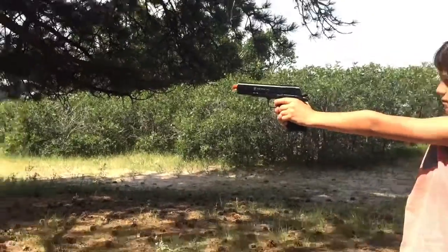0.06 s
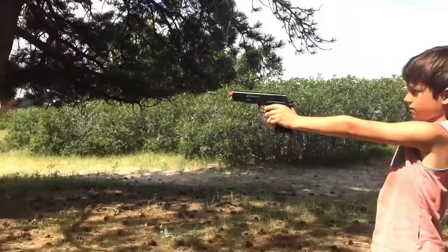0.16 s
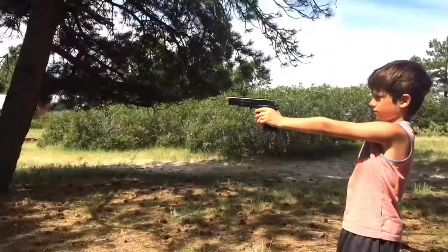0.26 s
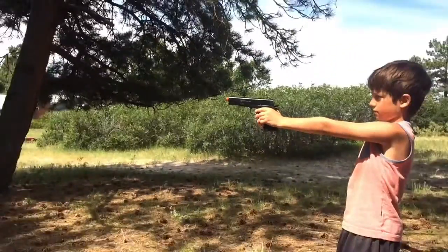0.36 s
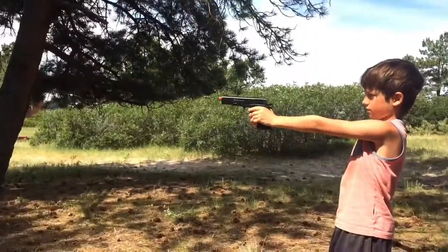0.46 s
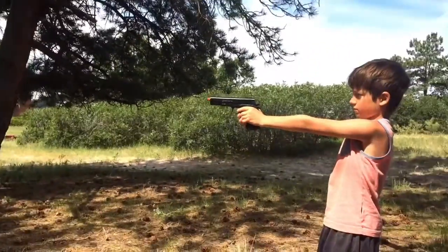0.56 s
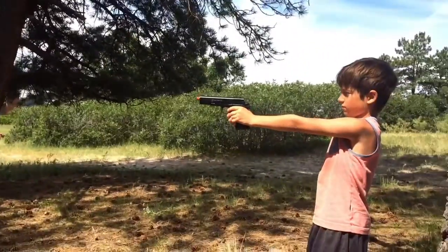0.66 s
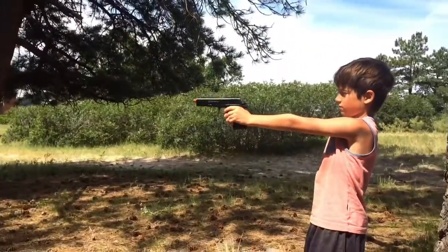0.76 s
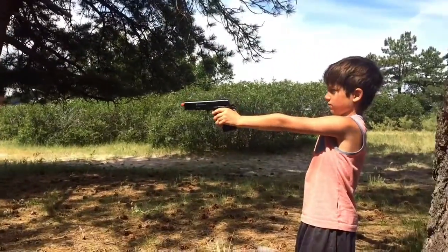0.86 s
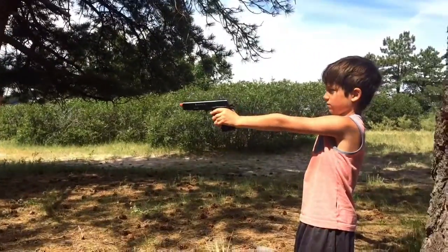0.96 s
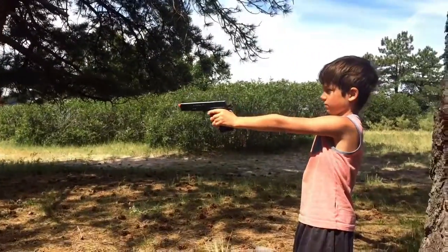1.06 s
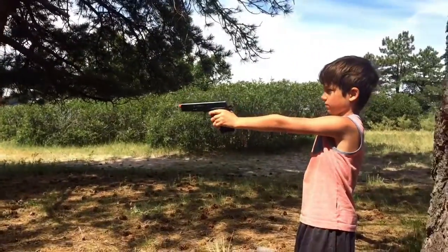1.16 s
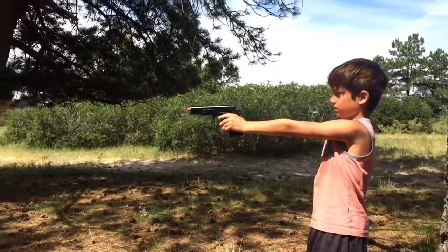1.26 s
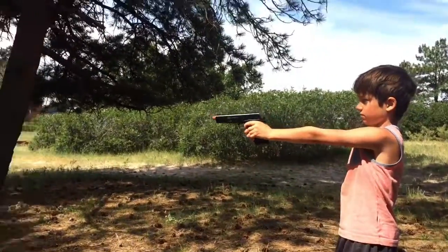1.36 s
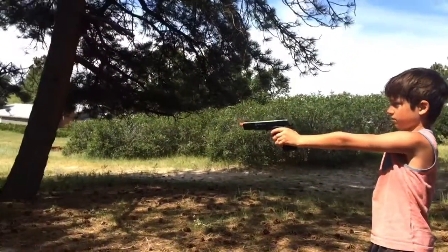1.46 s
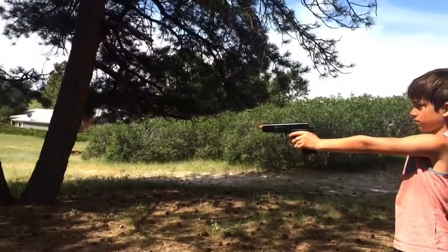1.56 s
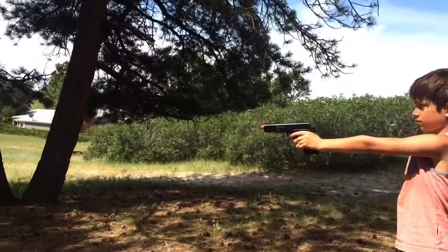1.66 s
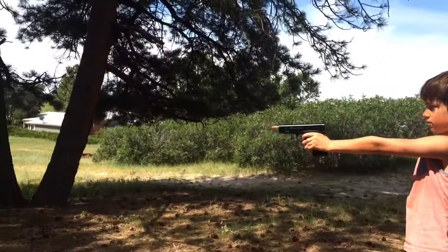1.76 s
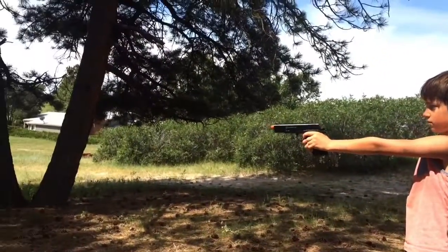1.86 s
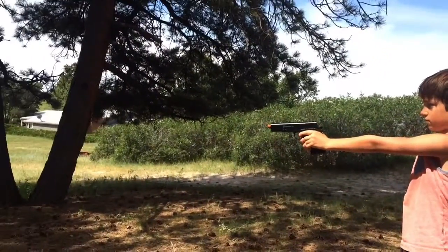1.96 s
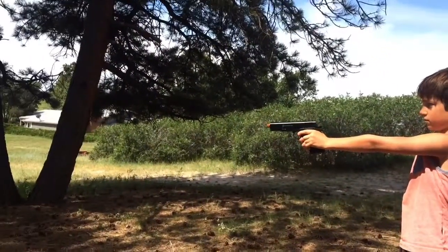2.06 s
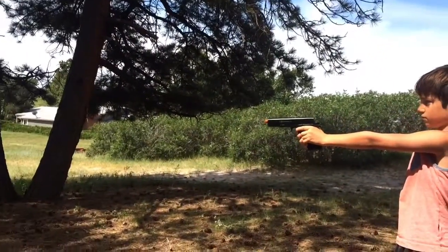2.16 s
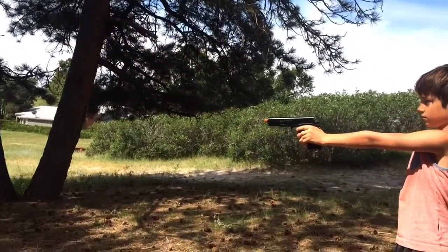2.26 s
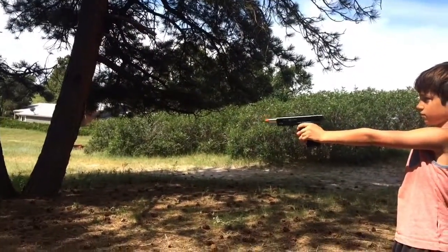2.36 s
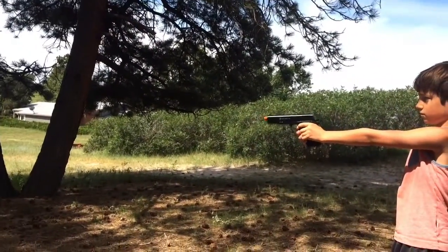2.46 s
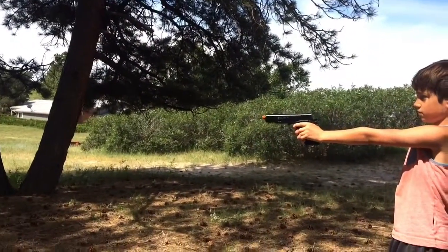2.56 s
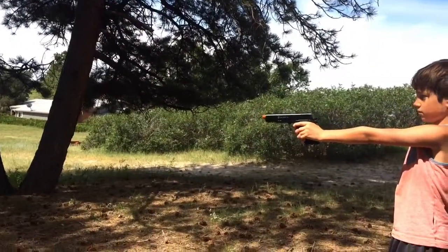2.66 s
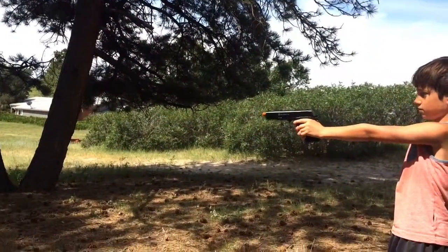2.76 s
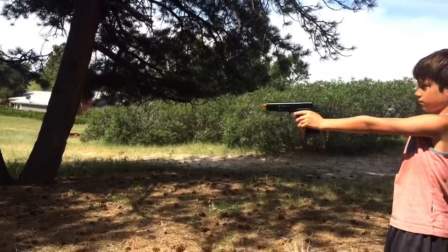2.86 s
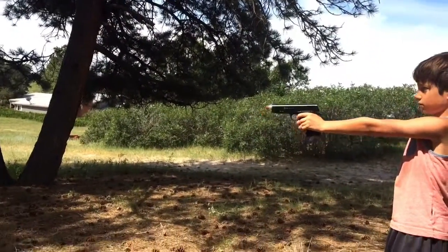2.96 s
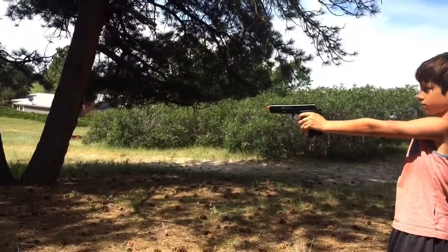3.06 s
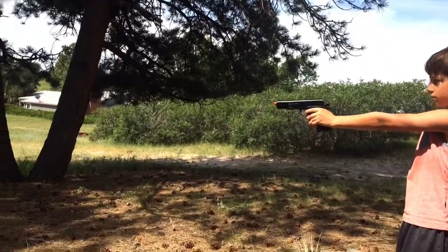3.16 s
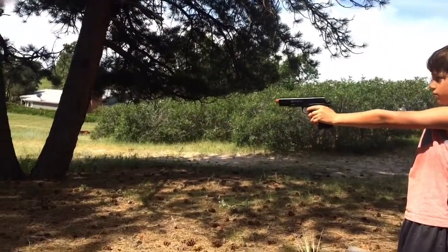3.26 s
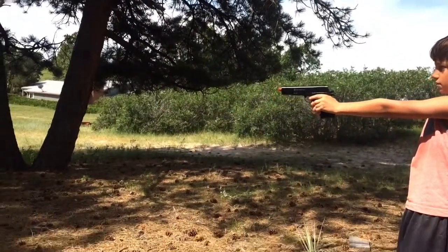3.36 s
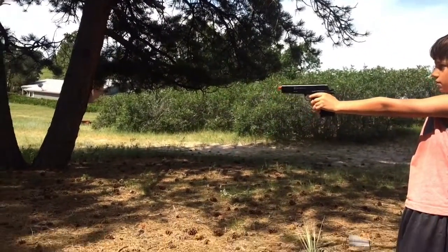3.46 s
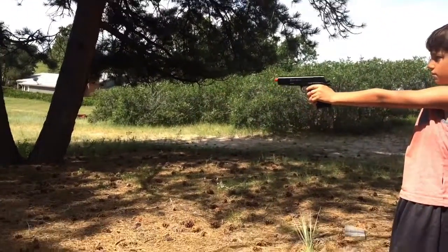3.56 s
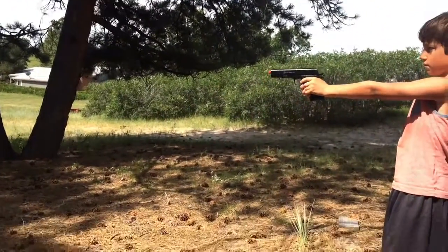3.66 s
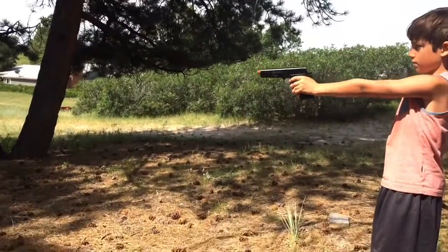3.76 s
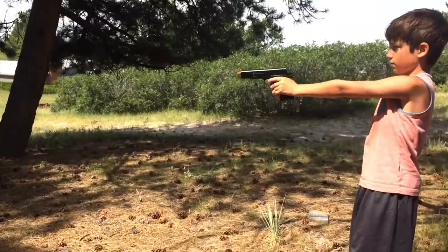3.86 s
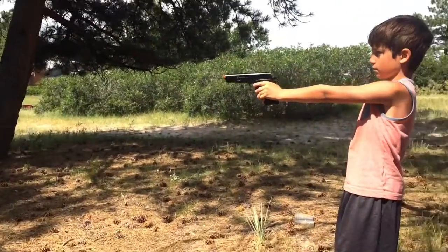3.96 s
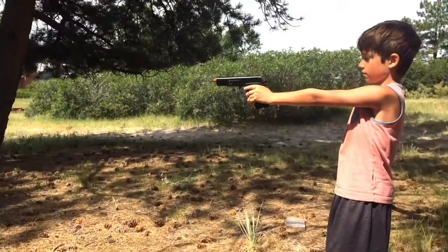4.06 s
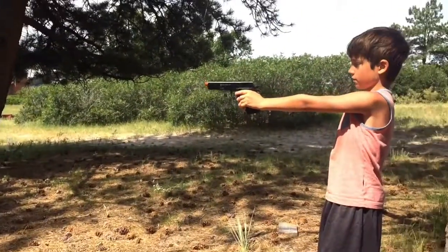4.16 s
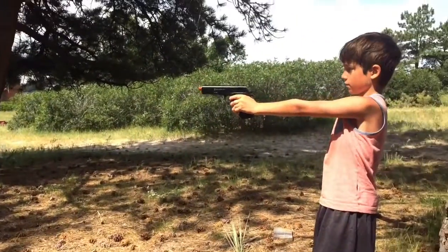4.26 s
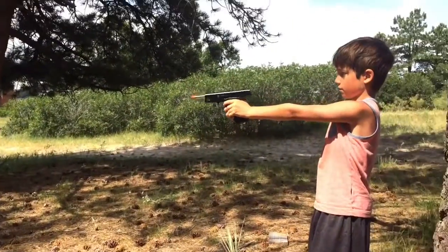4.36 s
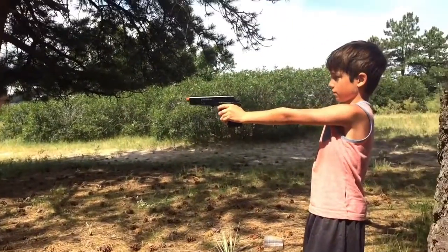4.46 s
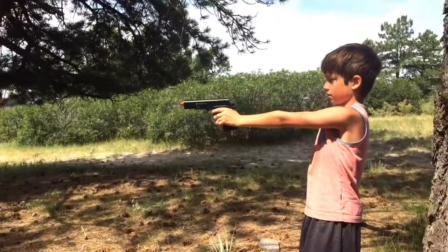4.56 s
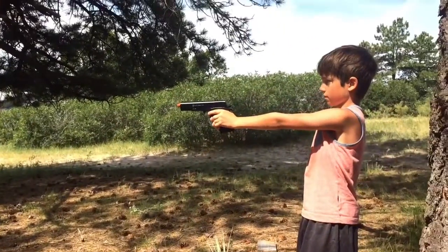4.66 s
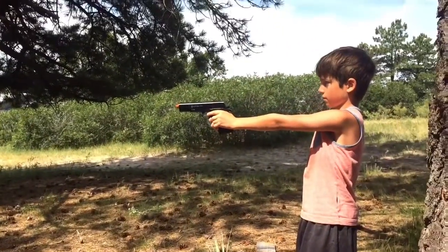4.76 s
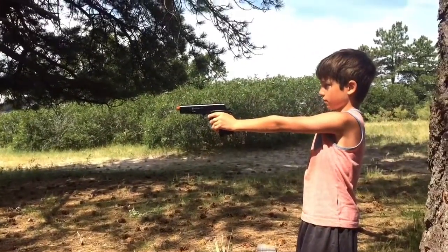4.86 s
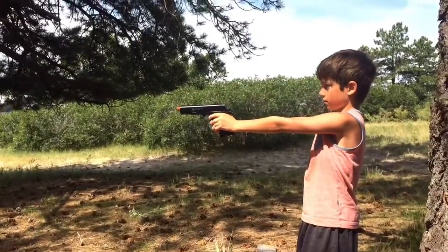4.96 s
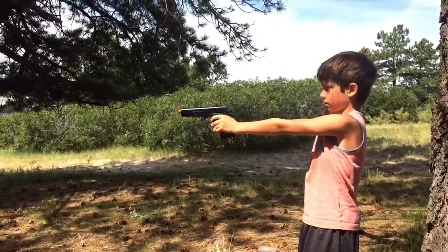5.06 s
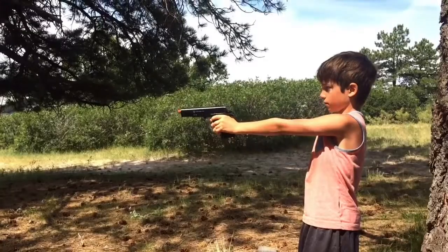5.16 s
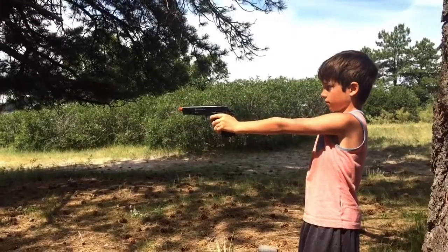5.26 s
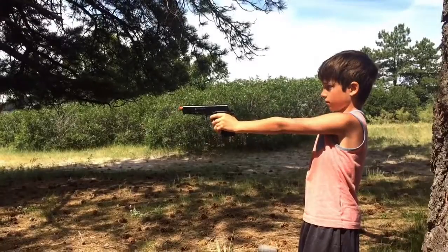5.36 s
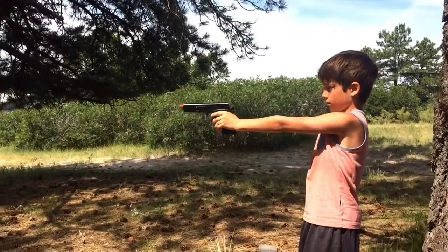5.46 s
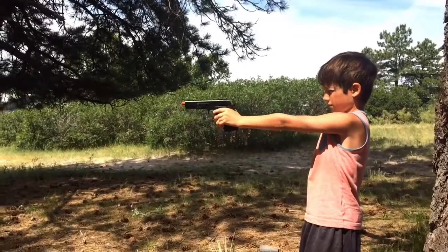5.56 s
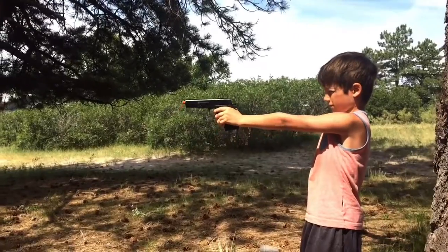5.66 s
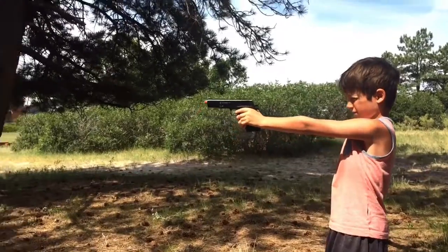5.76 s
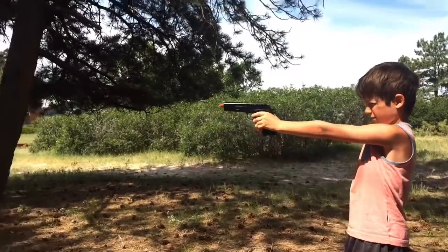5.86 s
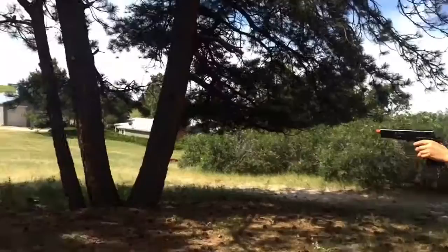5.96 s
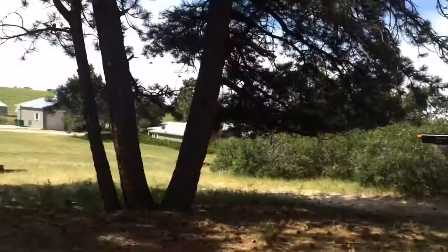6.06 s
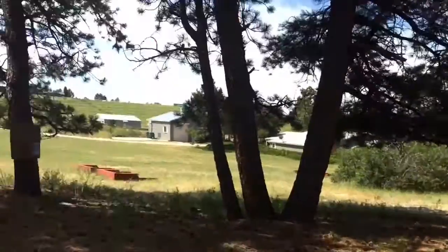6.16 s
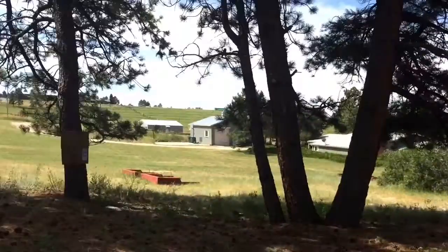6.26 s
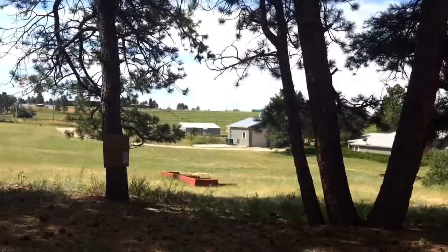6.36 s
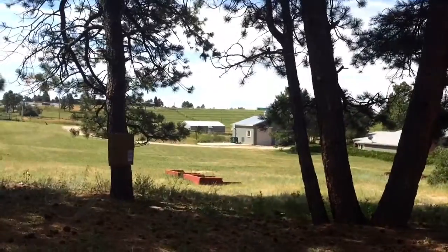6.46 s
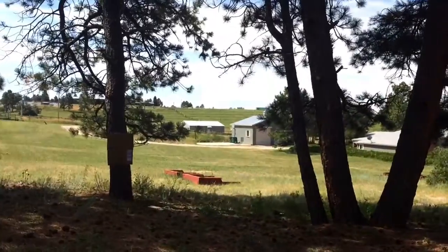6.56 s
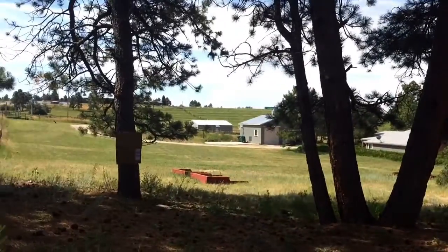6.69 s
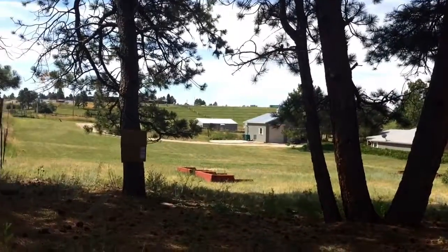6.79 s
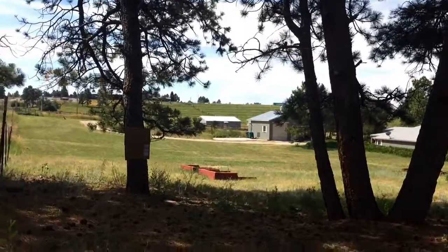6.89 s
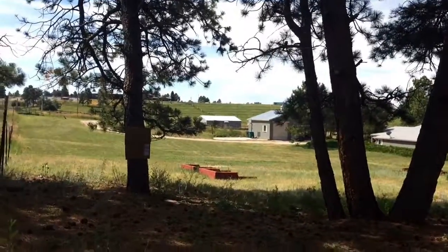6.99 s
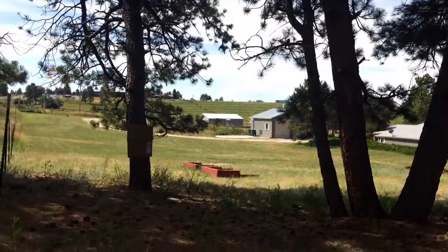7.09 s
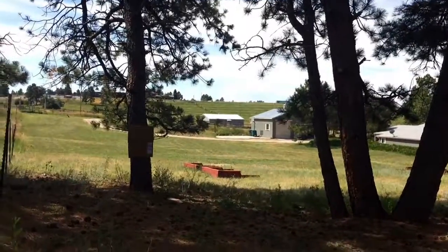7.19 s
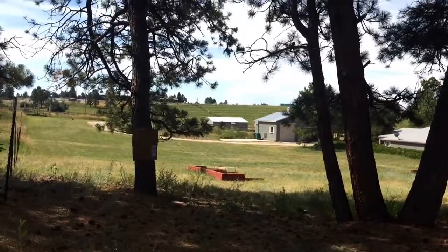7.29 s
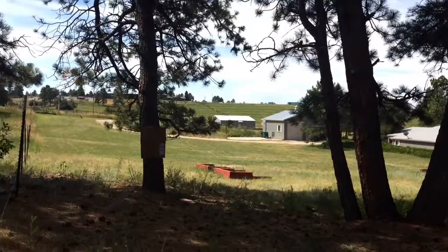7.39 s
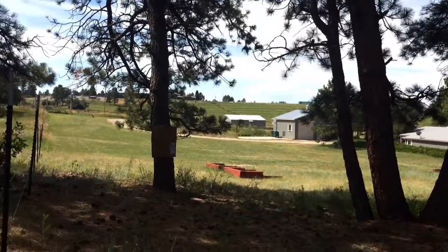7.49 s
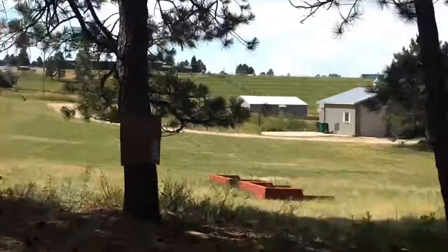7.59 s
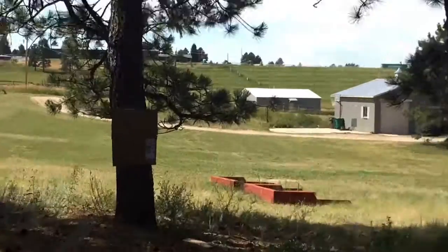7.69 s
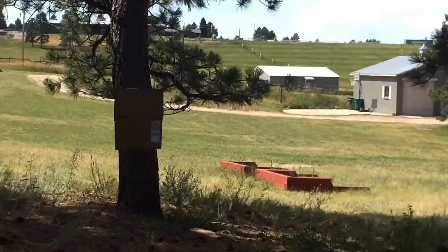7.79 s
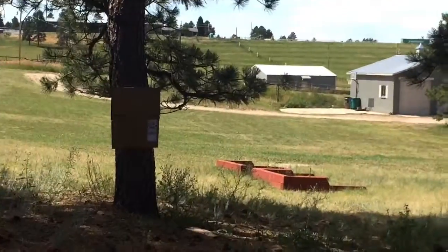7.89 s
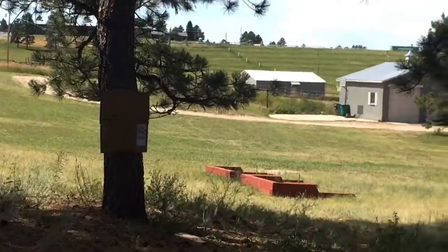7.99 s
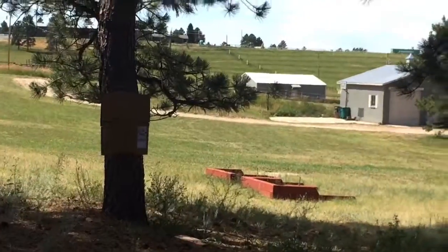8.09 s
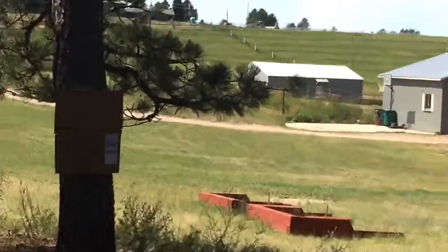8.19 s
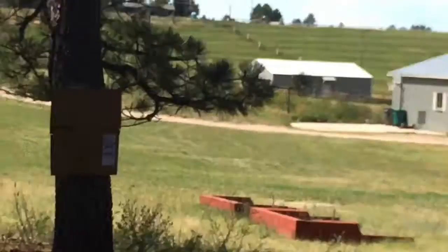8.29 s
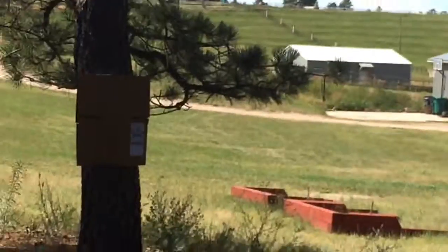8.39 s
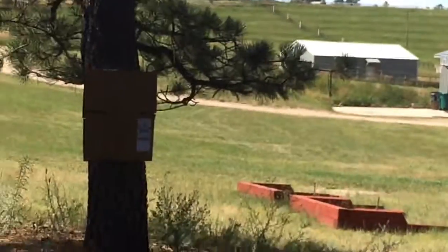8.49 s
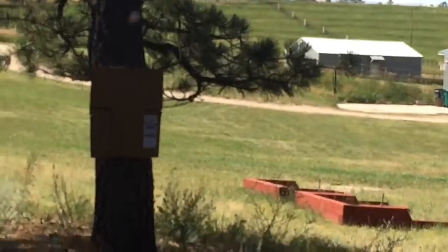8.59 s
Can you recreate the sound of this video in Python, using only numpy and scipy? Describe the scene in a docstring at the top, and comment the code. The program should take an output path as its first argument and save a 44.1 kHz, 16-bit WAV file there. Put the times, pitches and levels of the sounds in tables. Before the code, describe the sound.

Eight snappy airsoft pistol shots in a steady run, then one more after a pause, with pellets hitting cardboard and faint birdsong.

```python
"""Small birds call under pine trees over a faint rumble, and something knocks softly. Then a gas blowback
airsoft pistol fires nine times: each shot is a puff of gas that drives the slide back, and a spring slams
it shut. Trunks scatter the crack, and a tenth of a second after most shots the pellet smacks a cardboard
target on a trunk. The trigger clicks as it resets, then far buildings and woods return a dull echo.
The birds are heard again in the pause before the last shot."""
import sys
import numpy as np
from scipy import signal
from scipy.fft import rfft, irfft
from scipy.io import wavfile
from scipy.ndimage import uniform_filter1d

SR = 44100
rng = np.random.default_rng(int(sys.argv[2]) if len(sys.argv) > 2 else 0)


def put_to_file(sound):
    """Save the sound as 16-bit audio at rate SR, in the file named by the first command-line argument."""
    columns = np.atleast_2d(sound).T  # one column per channel
    safe = np.clip(columns, -1, 1)
    whole_steps = np.round(safe * 32767)
    wavfile.write(sys.argv[1], SR, whole_steps.astype(np.int16))


N = 380583
TIME = np.arange(N) / SR
AGE = TIME[:SR // 5]  # time within a puff or a bird note
BLOW = TIME[:SR // 16]  # time since a contact
CENTRE_S = AGE.mean()  # pre-roll of a puff or a recoil stroke


def from_db(db):
    """Decibels to gain."""
    return 10 ** (np.asarray(db) / 20)


def rms_one(x):
    """Scale to unit power."""
    return x / np.sqrt(np.mean(x ** 2) + 1e-20)


def fade(t60, age=AGE):
    """Exponential decay, 60 dB down after t60 seconds."""
    return np.exp(-np.log(1000) * age / t60)


def add(track, s, sound):
    """Mix a sound in at time s."""
    start = max(round(s * SR), 0)
    track[start:start + len(sound)] += sound[:N - start]


def through(x, response):
    """Pass a sound through an impulse response."""
    return signal.oaconvolve(x, response)[:len(x)]


def butter(order, hz, kind):
    """Butterworth filter sections."""
    return signal.butter(order, hz, kind, fs=SR, output="sos")


def colour(x, eq):
    """Minimum-phase EQ of unit power: the curve sets the tone, not the level."""
    size = 2048
    hz, db = np.transpose(eq)
    bin_hz = np.arange(size // 2 + 1) * SR / size
    gain = from_db(np.interp(np.log(bin_hz + 1), np.log(hz), db))
    cepstrum = irfft(np.log(rms_one(gain)))
    cepstrum[1:size // 2] *= 2
    cepstrum[size // 2 + 1:] = 0
    return through(x, irfft(np.exp(rfft(cepstrum))))


def burst(t60):
    """The dense, quickly dying vibration of one contact."""
    return rng.standard_normal(len(BLOW)) * fade(t60, BLOW)


def tone(hz, t60):
    """One struck mode."""
    return fade(t60, BLOW) * np.sin(2 * np.pi * hz * BLOW)


def ring(modes, hz_scale):
    """Struck modes, each a little different in strength from blow to blow."""
    return sum(from_db(db + rng.standard_normal()) * tone(hz * hz_scale, t60) for hz, db, t60 in modes)


# Bass-heavy outdoor bed: (frequency [Hz], level [dB])
AIR_EQ = [(15, -39.5), (25, -10.5), (70, 2.5), (206, -10), (270, -19.5), (394, -19.5), (1260, -28),
          (1890, -27.5), (2550, -31.5), (3720, -30.5), (4370, -35.5), (5280, -30.5), (8590, -36.5),
          (14800, -38.5), (16000, -48)]


def open_air():
    """A faint hiss over a steady rumble."""
    air = colour(rng.standard_normal(N), AIR_EQ)
    rumble = signal.sosfilt(butter(2, [35, 200], "band"), air)
    hiss = signal.sosfilt(butter(3, 280, "high"), air)
    return from_db(-66) * rms_one(rumble) + from_db(-71.5) * rms_one(hiss)


def phrase(start_s, count, period_s, length_s, from_hz, to_hz, db, bend=1, rasp=0):
    """A bird repeats one gliding note; bend over 1 holds its first pitch, rasp tears it downwards."""
    out, along = np.zeros(N), np.linspace(0, 1, round(length_s * SR))
    envelope = from_db(db) * signal.windows.tukey(len(along), .3)
    for k in range(count):
        wobble = rms_one(uniform_filter1d(rng.standard_normal(len(AGE)), size=50))
        flutter = np.abs(wobble[:len(along)])
        hz = from_hz * (to_hz / from_hz) ** (along ** bend) * (1 - rasp * along * flutter)
        add(out, start_s + k * period_s, envelope * np.sin(2 * np.pi * np.cumsum(hz) / SR))
    return out


def birds():
    """A peep, falling whistles, thin twitters, faint chirps and raspy chips, smeared by the foliage."""
    peep = phrase(.1, 1, period_s=0, length_s=.055, from_hz=4000, to_hz=4200, db=-60.5, rasp=.2)
    whistles = phrase(.246, 3, period_s=.2305, length_s=.157, from_hz=7450, to_hz=3400, db=-57, rasp=.012)
    twitters = phrase(.56, 3, period_s=.075, length_s=.06, from_hz=7600, to_hz=8600, db=-70, bend=2)
    chirps = phrase(6.505, 2, period_s=.338, length_s=.045, from_hz=4000, to_hz=2700, db=-72)
    chips = phrase(7.082, 4, period_s=.133, length_s=.06, from_hz=4520, to_hz=4200, db=-61,
                   bend=3, rasp=.26)
    song = peep + whistles + twitters + chirps + chips
    foliage = rms_one(rng.standard_normal(len(AGE)) * fade(t60=.33)) / np.sqrt(len(AGE))
    return .49 * (song + through(song, foliage))


# Knock cues: (time [s], relative level [dB])
KNOCK_CUES = [(0.61, -48.5), (2.286, -37.5), (2.386, -40), (2.409, -37), (2.819, -33.5), (5.134, -34),
              (5.181, -40), (5.269, -39.5), (8.304, -44.5)]
# Boxy midrange of a knock: (frequency [Hz], level [dB])
KNOCK_EQ = [(150, -20), (500, -12), (850, 2.5), (1150, -3), (1600, -14.5), (3500, -26.5), (12000, -39.5)]


def knocks():
    """Soft hollow knocks, each one damped contact."""
    out = np.zeros(N)
    for s, db in KNOCK_CUES:
        add(out, s + .0053, from_db(db - 7) * colour(burst(t60=.049), KNOCK_EQ))
    return out


VENT_S = .0056  # from the valve opening to the gas venting


def gas_puff():
    """A slow dip of pressure, the spike from the muzzle, and a suction when the valve shuts."""
    t = AGE - CENTRE_S
    spike_s, spread_s, dip_lead_s, dip_s = .0004, .0041, .0075, .0076
    spike = lambda u: (np.exp(-np.abs(u) / spike_s) + np.exp(-np.abs(u) / spread_s)) / 2
    dip = from_db(-6.5) * np.exp(-np.abs(t + dip_lead_s) / dip_s)
    suction = from_db(3) * spike(t - VENT_S)
    # the air moves out and back: no net push
    return signal.sosfiltfilt(butter(2, 39, "high"), spike(t) - suction - dip)


def recoil_stroke():
    """The hammer falls, gas escapes, and the slide hits its stop and rattles forward, ever softer."""
    out = np.zeros(len(AGE))
    back_stop_s, rattle_gap_s, rattle_loss_db = .0101, .008, 5
    contact = lambda after_s, db, t60: add(out, CENTRE_S + after_s, from_db(db) * burst(t60))
    contact(-.023, db=-35, t60=.098)  # hammer
    contact(-.005, db=-19.5, t60=.023)  # first seep of gas
    contact(-.0018, db=-12, t60=.023)  # leak
    contact(0, db=-.5, t60=.012)  # muzzle
    contact(VENT_S, db=-1.5, t60=.02)
    for k in range(4):
        contact(back_stop_s + k * rattle_gap_s, db=1.5 - k * rattle_loss_db, t60=.035)
    return out


# Shot cues: (valve opens [s], slide shuts [s], relative puff level [dB], relative ring level [dB])
SHOT_CUES = [(0.956, .998, -3, -0.5), (1.597, 1.6422, -5, 3.5), (2.0916, 2.129, 1.5, -2.5),
             (2.6657, 2.7075, 1, -3), (3.284, 3.326, 3, 1.5), (3.9256, 3.967, -3, -4),
             (4.67, 4.7135, -11, -2.5), (5.3174, 5.362, -6.5, 0), (7.593, 7.638, -25, -11)]
# Low body of the gas thump: (frequency [Hz], level [dB])
THUMP_EQ = [(40, -12), (110, -3), (170, 0), (270, -4), (450, -4.5), (700, -11.5), (2000, -28.5),
            (15000, -48.5)]
# Bite of the report: (frequency [Hz], level [dB])
REPORT_EQ = [(100, -7), (450, -2), (900, -8), (1400, -5.5), (2050, 2), (2500, 1), (3000, 2), (4000, -6),
             (6000, -9), (6700, -2.5), (9000, 0), (10500, -5.5), (15500, -8.5)]
# Bright clack of the closing slide: (frequency [Hz], level [dB])
SLAM_EQ = [(100, -18.5), (700, -24.5), (1200, -18.5), (2000, -7.5), (3000, 0.5), (4200, -14), (6100, -11.5),
           (6700, 1.5), (8700, 0.5), (10000, -8.5), (15500, -8.5)]
# Metallic ring of the slide: (frequency [Hz], level [dB], t60 [s])
SLIDE_MODES = [(1990, -16, 0.047), (2880, -10, .022), (3033, -1, 0.035), (3090, 0.5, 0.017),
               (3460, -8.5, 0.025), (6430, -18, 0.026), (6700, -11, 0.02), (8800, -12, .025),
               (9300, -12, 0.034)]


def pistol():
    """Gas drives the slide back (the report); the spring slams it shut and it bounces (the clack)."""
    report, clack = np.zeros((2, N))
    puff = gas_puff()
    barrel_s, bounce_s = .001, .0066  # gas reaches the muzzle; slide lands again
    for fire_s, shut_s, puff_db, ring_db in SHOT_CUES:
        add(report, fire_s + barrel_s - CENTRE_S, from_db(puff_db - 1.5) * puff)
        add(report, fire_s, from_db(puff_db / 3 - 11.5) * colour(burst(t60=.053), THUMP_EQ))
        add(report, fire_s - CENTRE_S, from_db(-10) * colour(recoil_stroke(), REPORT_EQ))
        # chambering the next pellet knocks the hollow grip just before the slide shuts
        add(clack, shut_s - bounce_s, from_db(-29) * tone(hz=470, t60=.011))
        slam_db = -6 - .3 * ring_db  # the more the slide rings, the softer its slam
        for lag_s, slam_trim_db, ring_trim_db in ((0, 0, 0), (bounce_s, -5, -8)):
            slam = from_db(slam_db + slam_trim_db) * colour(burst(t60=.026), SLAM_EQ)
            metal = from_db(ring_db + ring_trim_db - 10.5) * ring(SLIDE_MODES, rng.normal(1, .0073))
            add(clack, shut_s + lag_s, slam + metal)
    return report, clack


def scatter(delay_s, rise_s, hold_s, t60, grain_db):
    """Response of many small reflections of uneven size that build up, last a while and die away."""
    age = np.maximum(TIME[:SR] - delay_s, 0)
    shape = (1 - np.exp(-age / rise_s)) * fade(t60, np.maximum(age - hold_s, 0))
    sizes = from_db(grain_db * np.clip(rng.standard_normal(SR), -2, 2))
    return rms_one(shape * sizes * rng.standard_normal(SR)) / np.sqrt(SR)


def diffuse(x, response, eq):
    """Countless reflections of a source's mids and highs merge into a wash of noise in its colour."""
    treble = signal.sosfilt(butter(2, 600, "high"), x)
    power = np.maximum(through(treble ** 2, response ** 2), 0)
    return colour(np.sqrt(power) * rng.standard_normal(len(x)), eq)


# Bright splash off the near trunks: (frequency [Hz], level [dB])
TRUNKS_EQ = [(60, -22), (300, -16), (800, -3), (1800, 2), (3000, -1), (4500, 6.5), (8000, 0.5),
             (15500, -4.5)]
# Dull slapback from far away: (frequency [Hz], level [dB])
FAR_EQ = [(100, -20), (600, -15.5), (1200, 3.5), (2200, -1.5), (3200, -3.5), (5000, -3.5), (7000, -17),
          (14000, -20.5)]


def shot_echoes(report, clack):
    """Near trunks scatter the shot at once; far buildings and woods send it back later."""
    round_trip_s = .35
    trunks = from_db(-15.5) * scatter(delay_s=.0059, rise_s=.0076, hold_s=.01, t60=.26, grain_db=.5)
    walls = from_db(-41.5) * scatter(round_trip_s, rise_s=.0005, hold_s=.00091, t60=.11, grain_db=5.5)
    woods = from_db(-43.5) * scatter(round_trip_s, rise_s=.047, hold_s=.05, t60=.85, grain_db=11)
    # the muzzle throws its report down range, so it echoes more than the clack
    shot = report + from_db(-8) * clack
    near = colour(diffuse(shot, trunks, REPORT_EQ), TRUNKS_EQ)
    far = colour(through(shot, walls) + diffuse(shot, woods, REPORT_EQ), FAR_EQ)
    return near + far


# Pellet impacts, levels relative: (time [s], smack [dB], crack [dB], sheet resonance [Hz], boom [dB])
HIT_CUES = [(1.0475, -66, -20, 2350, -34), (1.695, -9.5, -8.5, 1390, -11), (2.184, -13, -10, 960, -3.5),
            (2.7617, -9.5, -9.5, 974, -8), (3.3806, -29, -9.5, 1027, -17.5), (4.7698, -7, -9, 1440, -21),
            (5.4169, -6.5, -9, 1177, -9), (7.6959, -6.5, -8.5, 1850, -4.5)]
# Papery smack of the cardboard: (frequency [Hz], level [dB], t60 [s])
CARDBOARD_MODES = [(520, -19.5, 0.012), (864.4, -16, 0.062), (995.6, -13.5, 0.053), (1237, -8, 0.053),
                   (1420, -4, 0.025), (1850, -5, 0.018), (2094, -0.5, 0.024), (2600, -4, 0.016),
                   (3470, -6, 0.013)]
# Sharp edge of the tear: (frequency [Hz], level [dB])
CRACK_EQ = [(200, -19.5), (600, -8.5), (1500, -3.5), (3500, 3), (6000, -2.5), (10000, -7.5), (15500, -18)]


def target():
    """A pellet snaps into the cardboard and tears it; the spot it hits sets which resonance booms."""
    crack, sheet = np.zeros((2, N))
    low_cut = butter(5, 540, "high")  # the sheet is too small to radiate bass
    boom_cycles = 24
    for s, smack_db, crack_db, hz, boom_db in HIT_CUES:
        snap = from_db(11) * (BLOW == 0) + from_db(-2) * burst(t60=.0034)
        tear = from_db(-8.5) * burst(t60=.032)
        smack = from_db(smack_db) * ring(CARDBOARD_MODES, rng.normal(1, .05))
        boom = tone(hz, t60=boom_cycles / hz) - tone(hz, t60=.0057)  # subtracting softens the attack
        add(crack, s, from_db(crack_db) * signal.sosfilt(low_cut, colour(snap + tear, CRACK_EQ)))
        add(sheet, s, signal.sosfilt(low_cut, smack + from_db(boom_db + 5) * boom))
    return crack, sheet


# Woody tail of the grove: (frequency [Hz], level [dB])
GROVE_EQ = [(200, -19), (600, -9.5), (1000, 2), (1900, 1), (3000, -8.5), (5000, -12.5), (15000, -8)]


def hit_echoes(crack, sheet):
    """The ground scatters the sheet's ring, and the grove scatters the crack."""
    ground = from_db(-12.5) * scatter(delay_s=.00076, rise_s=.001, hold_s=.001, t60=.056, grain_db=4)
    grove = from_db(-11) * scatter(delay_s=.0064, rise_s=.003, hold_s=.0022, t60=.28, grain_db=5.5)
    return through(sheet, ground) + colour(diffuse(crack, grove, CRACK_EQ), GROVE_EQ)


# Click cues, mostly the trigger's reset 0.2 s after a shot: (time [s], relative level [dB])
CLICK_CUES = [(1.1981, -29.5), (1.5546, -33.5), (1.777, -22.5), (2.268, -25), (2.831, -27), (3.463, -27),
              (4.137, -26.5), (4.8467, -22.5), (5.5169, -25.5), (6.3603, -51.5), (6.8324, -52.5),
              (7.7951, -30.5), (8.17, -46.5), (8.3562, -53)]
# Thin, crisp top of a click: (frequency [Hz], level [dB])
CLICK_EQ = [(200, -18.5), (1000, -21), (2200, -2), (3400, 3), (4800, -12.5), (7000, -7), (9300, -1),
            (12000, -12), (15500, -5)]


def trigger_clicks():
    """The trigger and faint handling click in two stages, the second softer."""
    out = np.zeros(N)
    for s, db in CLICK_CUES:
        add(out, s, from_db(db - .5) * colour(burst(t60=.012), CLICK_EQ))
        add(out, s + .005, from_db(db - 9) * colour(burst(t60=.015), CLICK_EQ))
    return out


def scene():
    """Mono mix of pistol and target with their echoes, over clicks, knocks, birds and air."""
    report, clack = pistol()
    crack, sheet = target()
    shots = report + clack + shot_echoes(report, clack)
    hits = crack + sheet + hit_echoes(crack, sheet)
    return (shots + hits + trigger_clicks() + knocks() + birds() + open_air())[None]


def duck(x, threshold_db, most_db, release_db_per_s, attack_s):
    """Loud peaks pull the gain down, by most_db at most; it then creeps back."""
    over_db = np.clip(20 * np.log10(np.abs(x) + 1e-9) - threshold_db, 0, most_db)
    release_db = release_db_per_s * TIME
    held_db = np.maximum.accumulate(over_db + release_db, axis=-1) - release_db
    pole = np.exp(-1 / (attack_s * SR))
    return x * from_db(-signal.lfilter([1 - pole], [1, -pole], held_db))


def record(dry):
    """Duck the bass after loud puffs, then the whole mix; round the peaks and cut the top steeply."""
    bass = signal.sosfiltfilt(butter(2, 420, "low"), dry)
    mix = dry - bass + duck(bass, threshold_db=-17.5, most_db=5, release_db_per_s=6, attack_s=.051)
    mix = duck(mix * from_db(2.5), threshold_db=-2, most_db=5.5, release_db_per_s=11.5, attack_s=.011)
    ceiling, top_hz = 1.2, 15350
    rounded = ceiling * np.tanh(mix / ceiling)
    return signal.sosfilt(signal.ellip(10, .2, 90, top_hz, fs=SR, output="sos"), rounded)


dry = scene()
out = record(dry)
put_to_file(out)
```